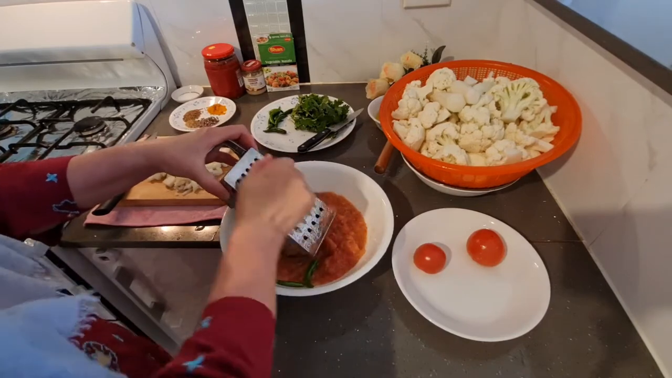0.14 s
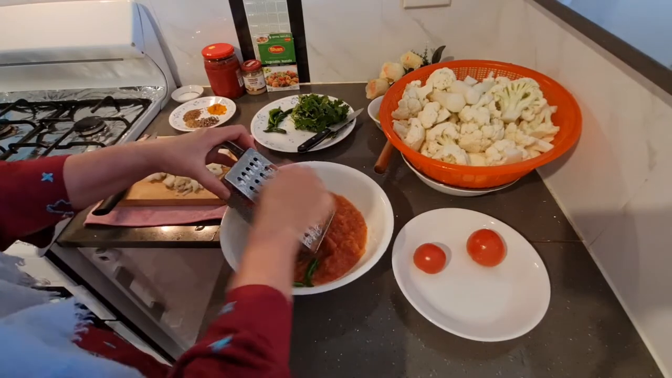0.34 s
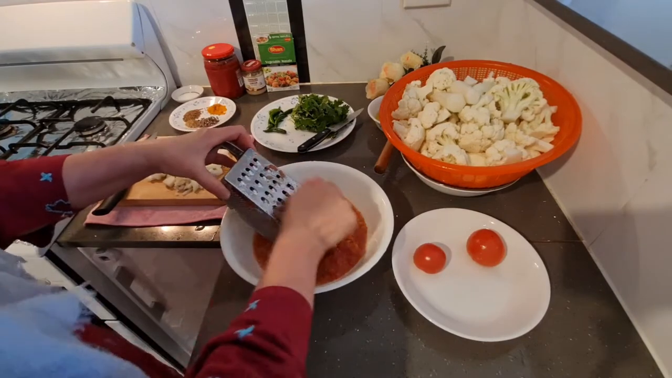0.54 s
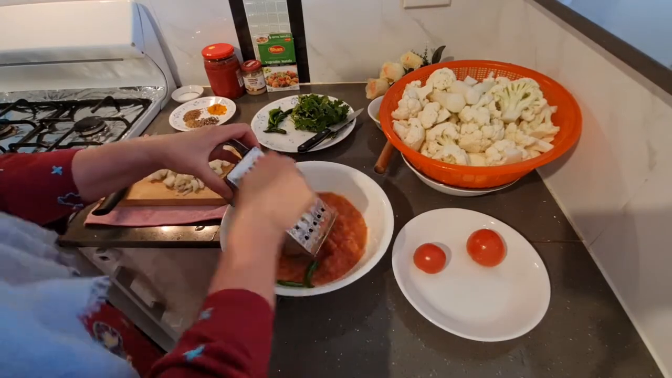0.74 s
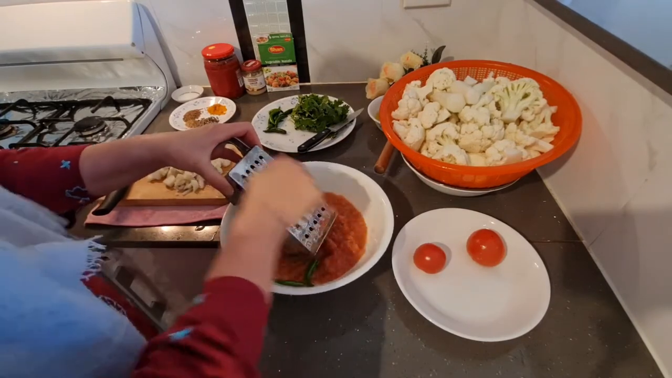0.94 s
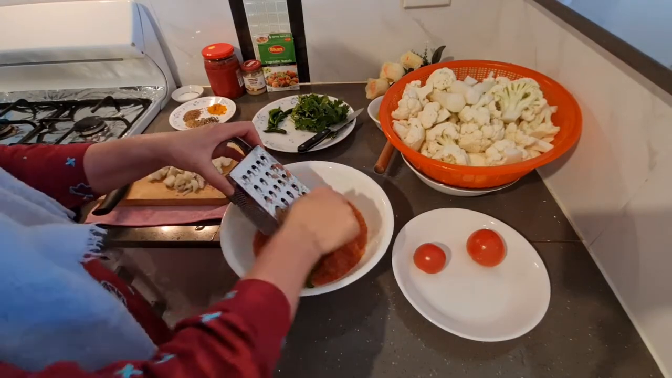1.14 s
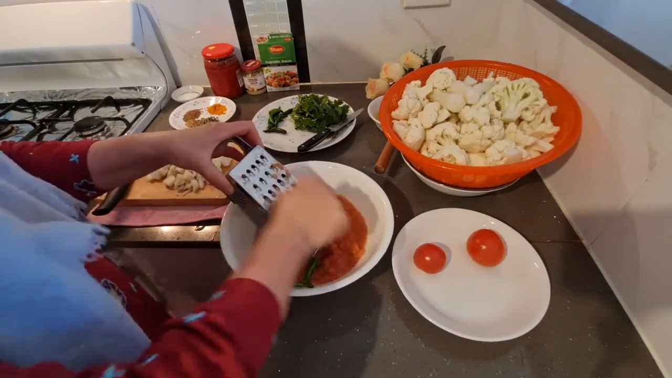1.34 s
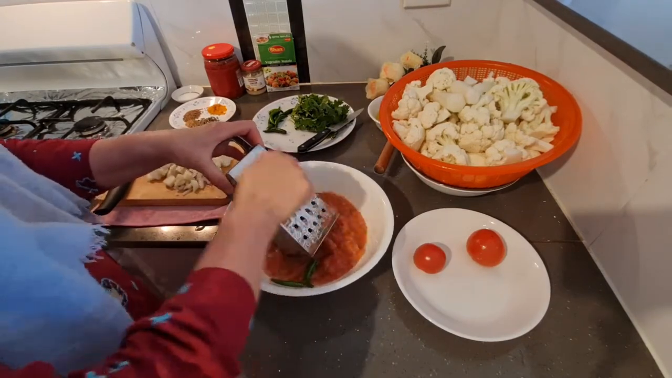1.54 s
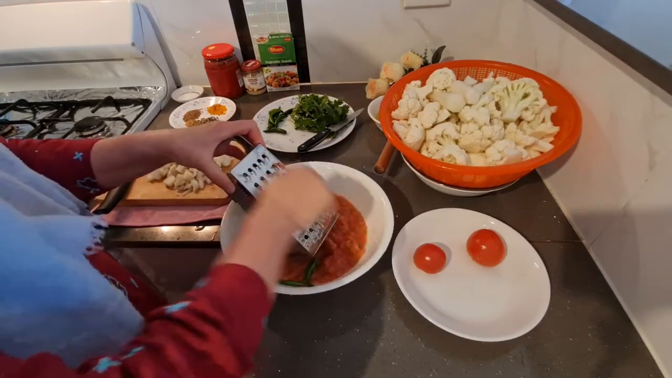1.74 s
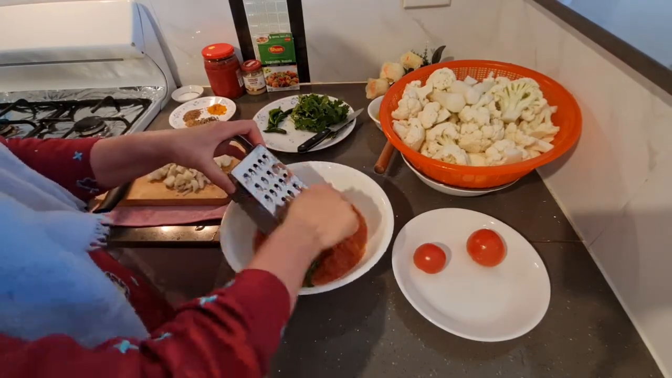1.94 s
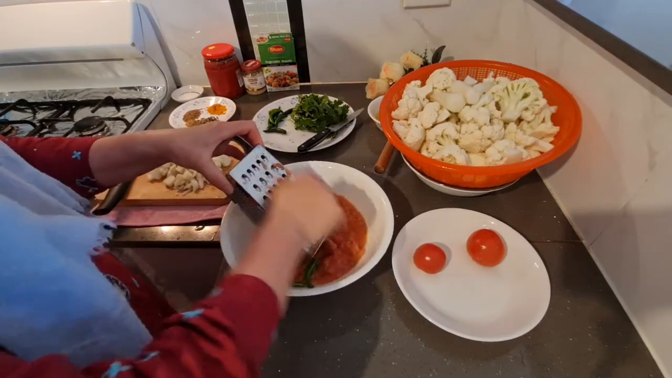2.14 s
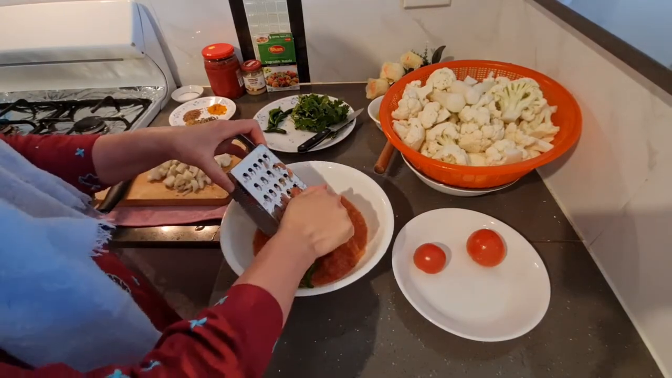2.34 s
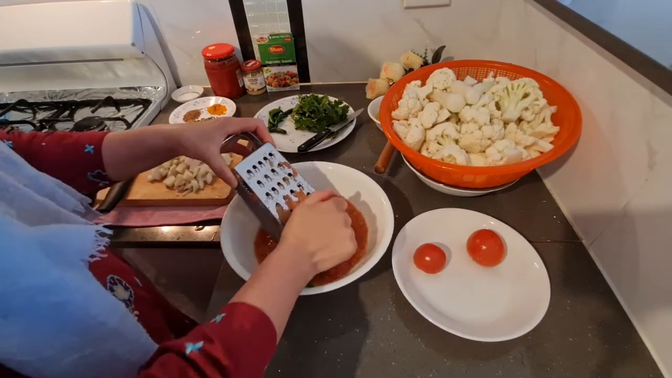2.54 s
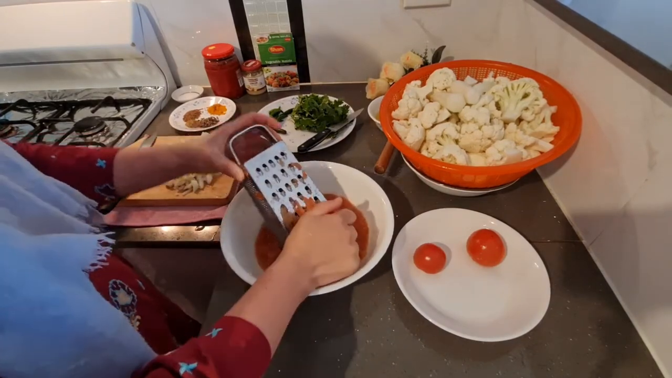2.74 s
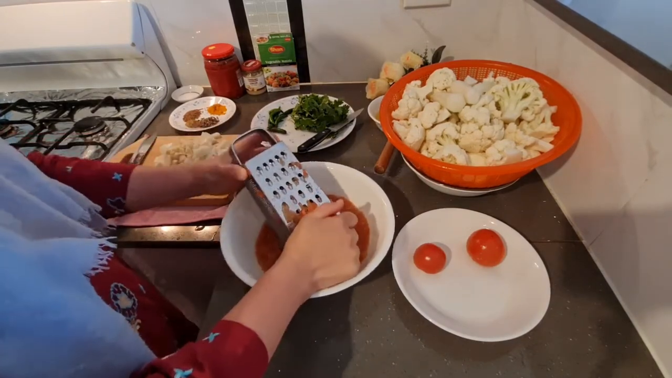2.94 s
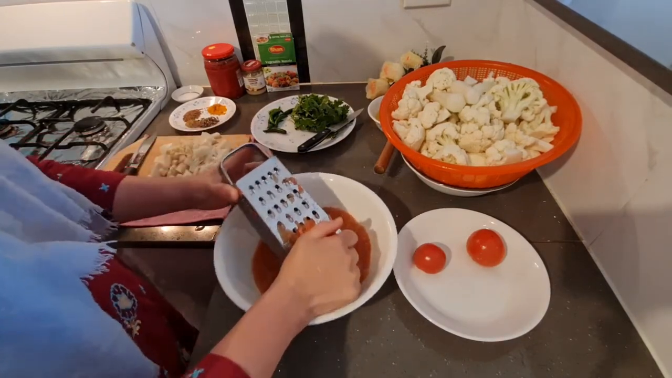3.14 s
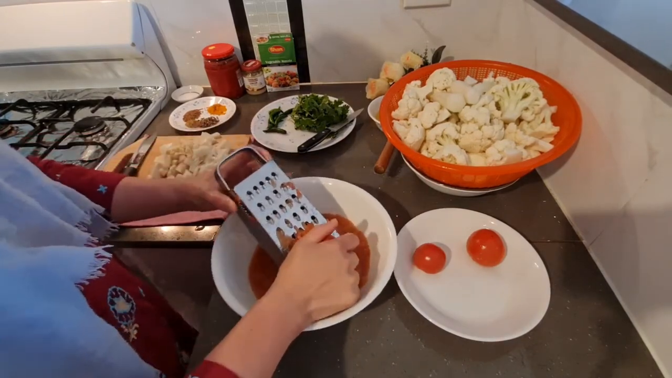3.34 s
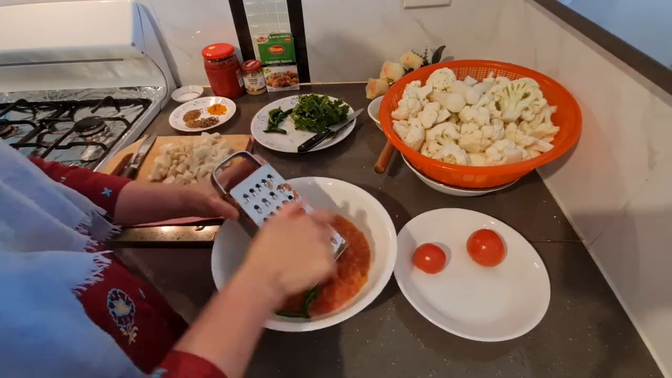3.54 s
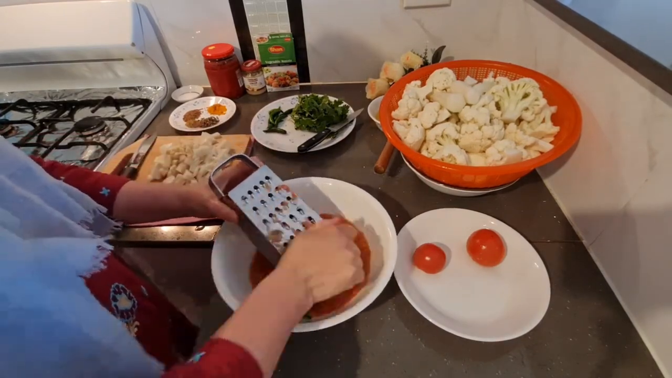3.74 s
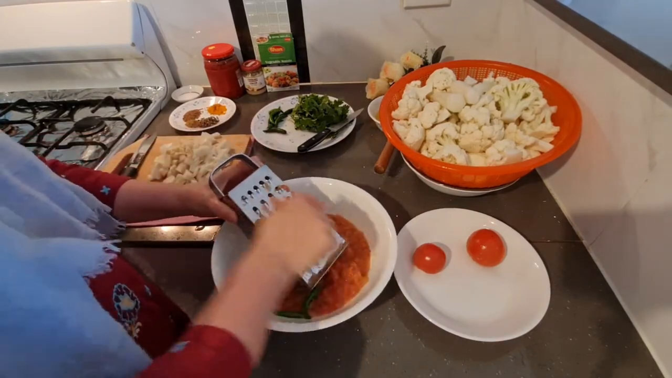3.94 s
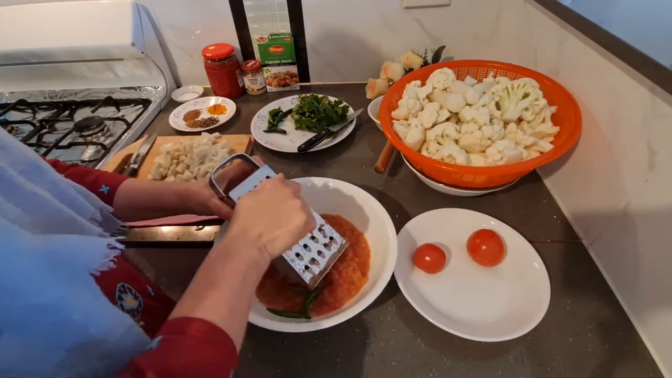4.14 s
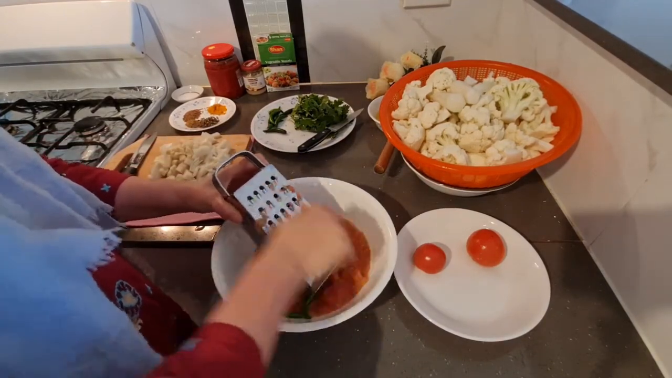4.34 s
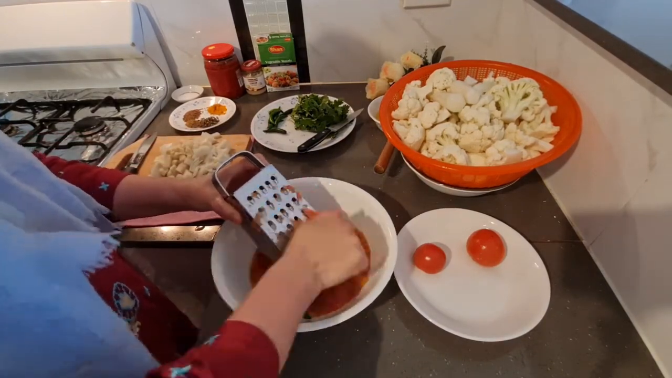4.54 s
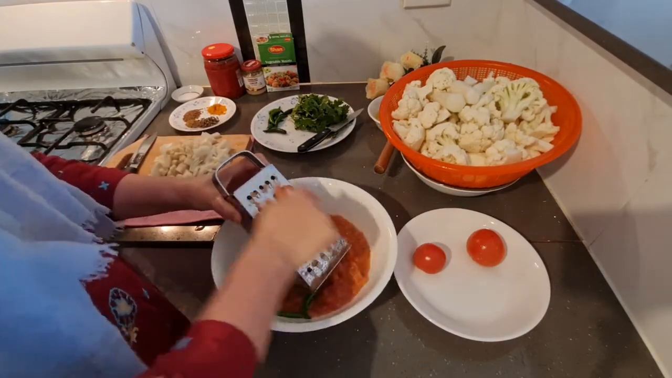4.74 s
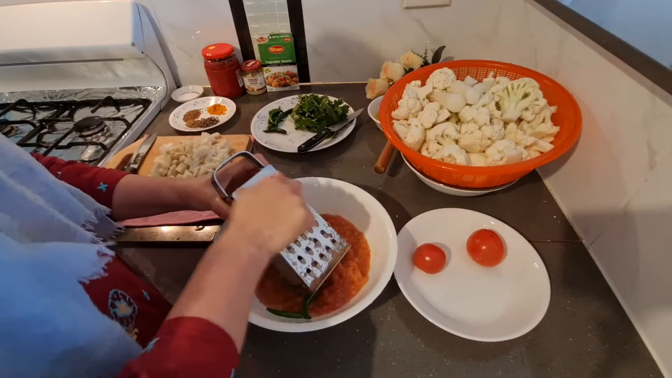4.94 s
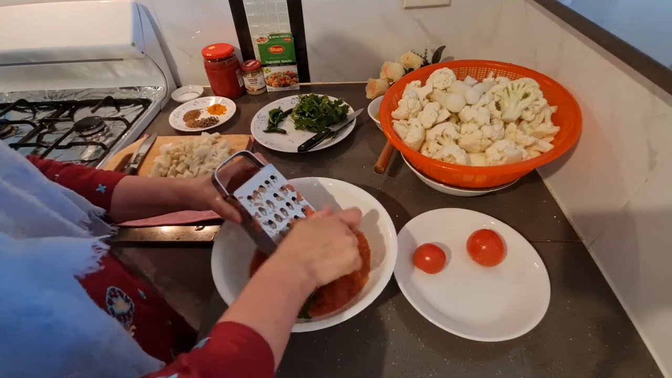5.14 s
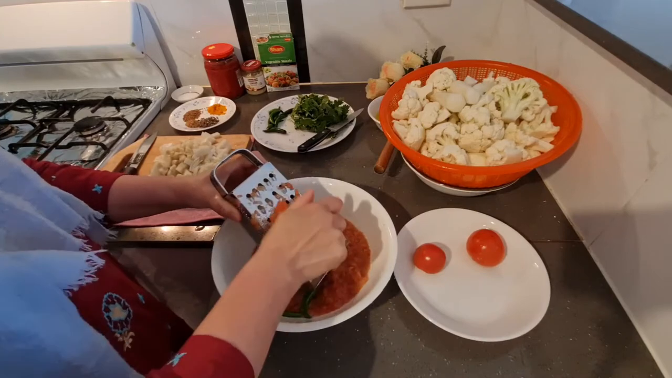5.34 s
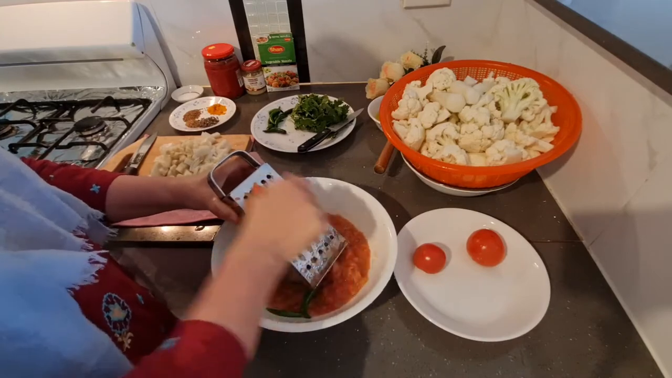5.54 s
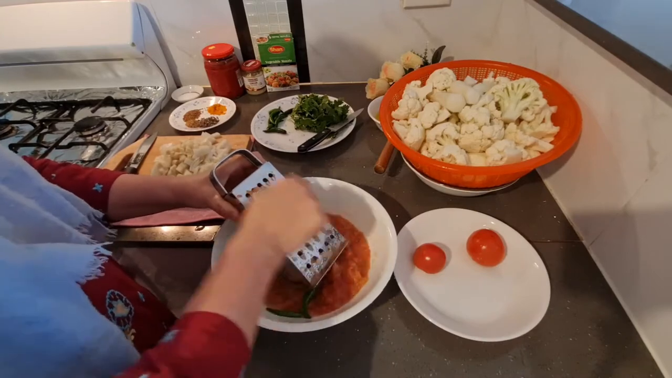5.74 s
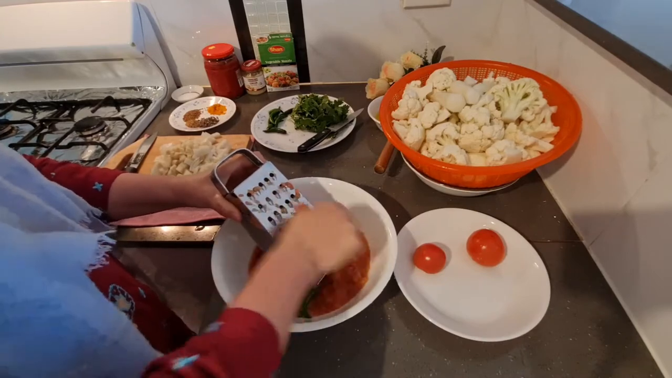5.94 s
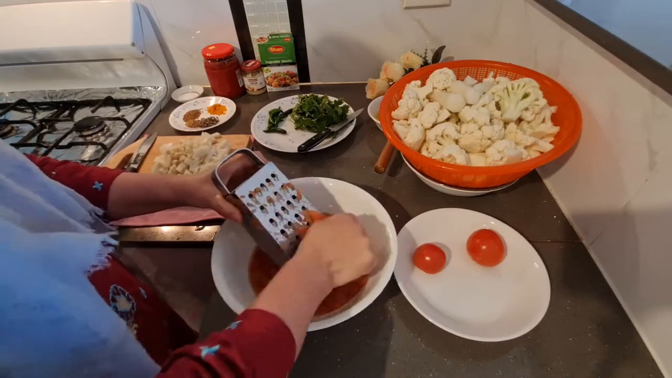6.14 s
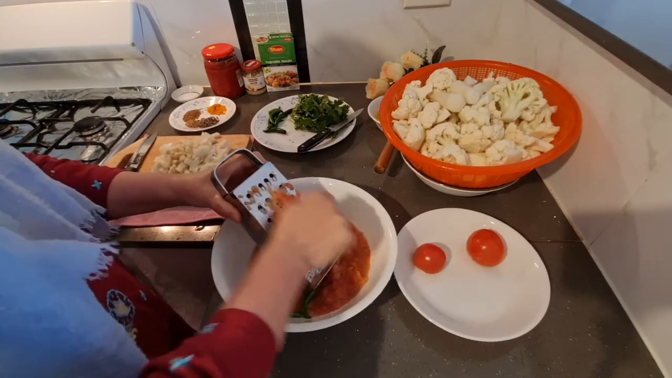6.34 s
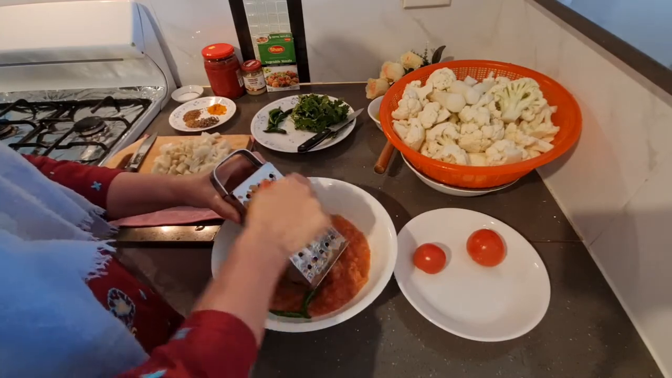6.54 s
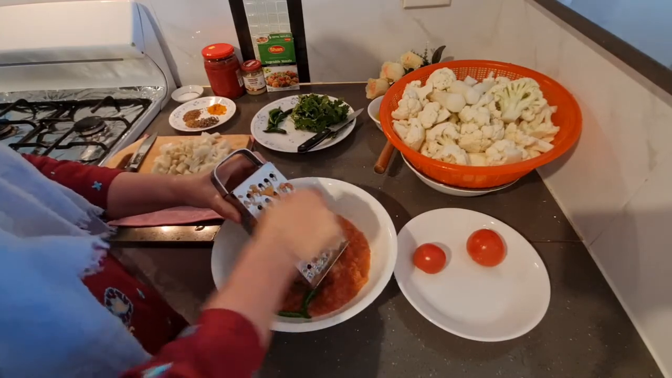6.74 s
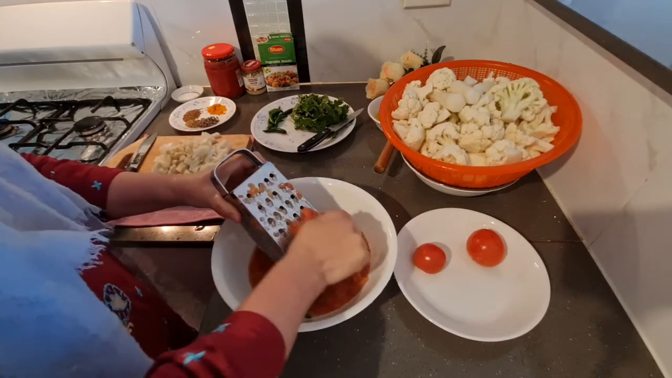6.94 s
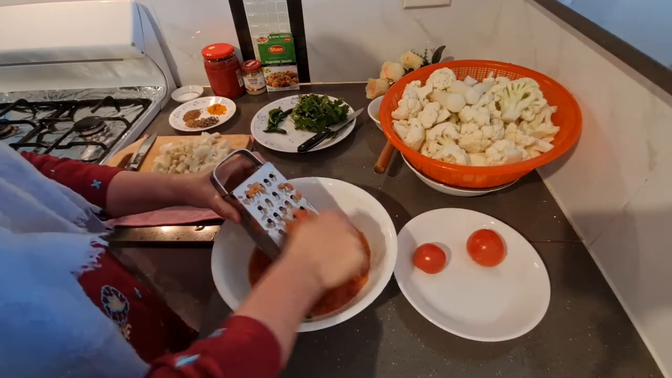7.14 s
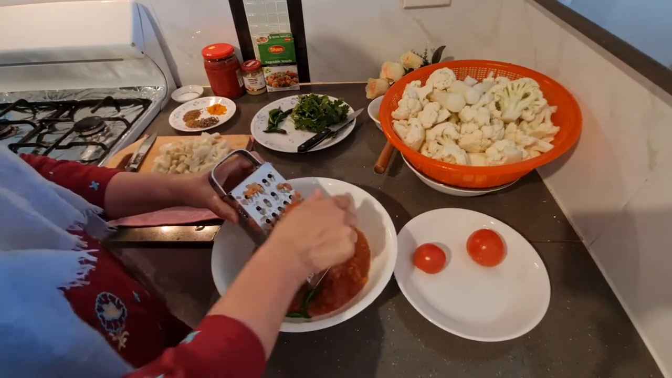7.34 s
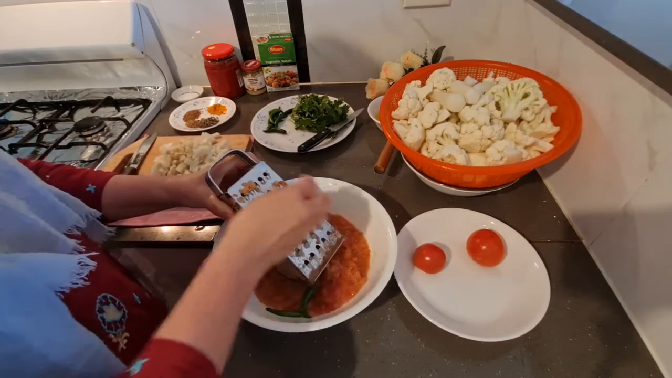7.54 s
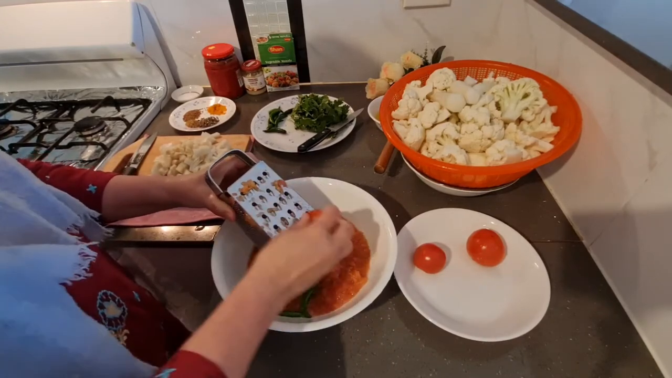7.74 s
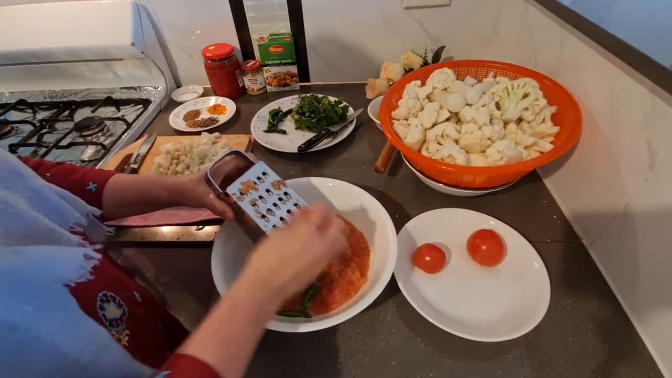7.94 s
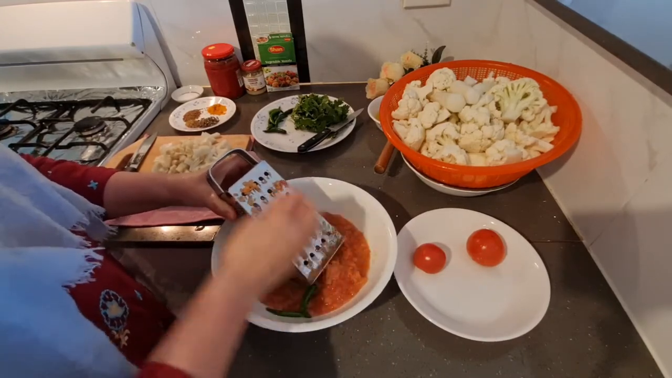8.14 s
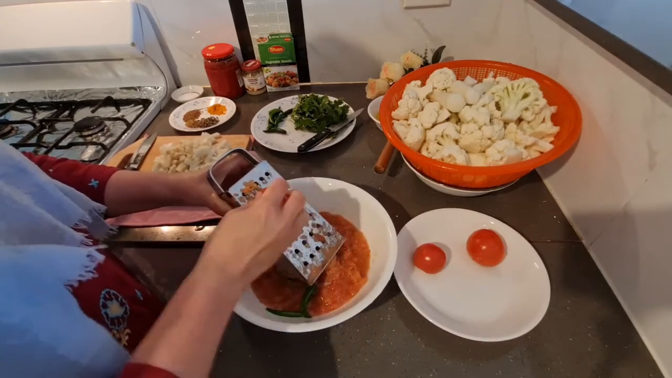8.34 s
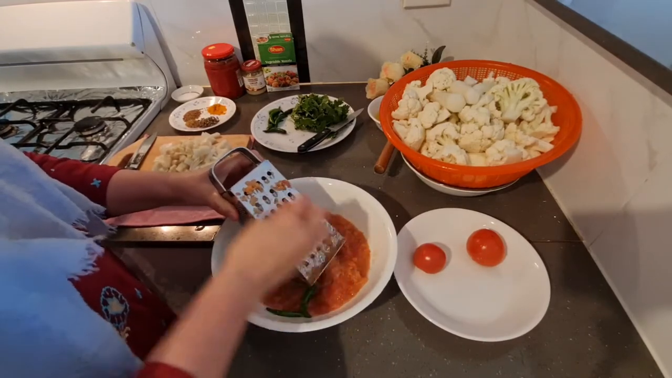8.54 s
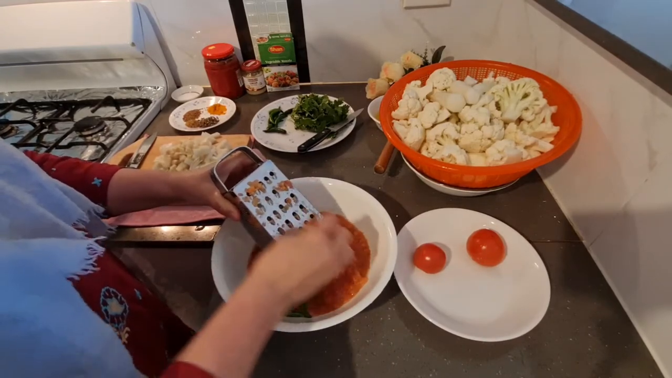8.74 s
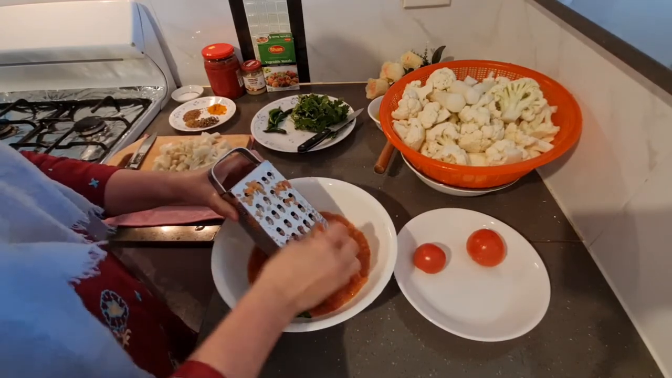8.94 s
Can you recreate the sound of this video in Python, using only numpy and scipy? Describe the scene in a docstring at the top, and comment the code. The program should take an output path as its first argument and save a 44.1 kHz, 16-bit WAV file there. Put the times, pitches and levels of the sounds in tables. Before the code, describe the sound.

A tomato is grated on a steel box grater in a bowl, heard close up in a very quiet kitchen. From the start, wet rasping strokes come about four times a second, each with a slight metallic ring and a low rumble through the counter. The loose bowl knocks on the counter with nearly every stroke, the loudest sound here, until about 2.8 seconds. The grating stops near 2.4 seconds, leaving a lull of soft handling and very faint wet squeaks. At 3.7 seconds the strokes resume without the knocking, dotted with small juice clicks and fingertip taps on the steel. They break briefly around 5.3 seconds, continue evenly from 5.6 to 7.3, and pause again. From 7.7 seconds lighter strokes carry on until the end at about 9 seconds.

```python
"""Grating a tomato

A steel box grater stands in a bowl on the counter of a very quiet kitchen. Each stroke tears wet flesh
over the teeth, rings the sheet steel and drums bowl and counter. At first the loose bowl rocks and
knocks at every stroke; later, wet skin squeaks faintly, juice clicks and fingertips tap the box."""
import sys
import numpy as np
from scipy import signal
from scipy.fft import rfft, irfft, next_fast_len
from scipy.io import wavfile
from scipy.ndimage import uniform_filter1d, map_coordinates

SR = 44100
rng = np.random.default_rng(int(sys.argv[2]) if len(sys.argv) > 2 else 0)


def put_to_file(sound):
    """Save the sound as 16-bit audio at rate SR, in the file named by the first command-line argument."""
    columns = np.atleast_2d(sound).T  # one column per channel
    safe = np.clip(columns, -1, 1)
    whole_steps = np.round(safe * 32767)
    wavfile.write(sys.argv[1], SR, whole_steps.astype(np.int16))


N = 396459


def amp(db):
    """Decibels to gain."""
    return 10 ** (np.asarray(db) / 20)

def unit(x):
    """Scale to rms 1."""
    return x / np.sqrt(np.mean(x ** 2) + 1e-20)

def along(points, hz):
    """Read a curve on a log frequency axis."""
    freqs, values = np.transpose(points)
    return np.interp(np.log(hz + 1), np.log(freqs + 1), values)

def automation(rows):
    """One lane per column after the time."""
    times, *lanes = np.transpose(rows)
    return [np.interp(np.arange(N) / SR, times, lane) for lane in lanes]

def filtered(x, response):
    """Apply a complex frequency response."""
    size = next_fast_len(N + SR)
    return irfft(rfft(x, size) * response(np.fft.rfftfreq(size, 1 / SR)), size)[..., :N]

def resonances(modes):
    """Response of a body with (pitch, width, level) modes."""
    return lambda f: sum((-1) ** k * amp(db) * 1j * f * width / (hz * hz - f * f + 1j * f * width)
                         for k, (hz, width, db) in enumerate(modes))

def struck(force, response):
    """Drive a body, at unity gain for white noise."""
    power = np.mean(np.abs(response(np.linspace(1, SR / 2, N // 4))) ** 2)
    return filtered(force, response) / np.sqrt(power)

def slips(grain_s, spread_db):
    """Friction: two noises share one uneven grip that changes every grain."""
    grip = map_coordinates(rng.standard_normal(N // 8), [np.arange(N) / (grain_s * SR)], order=1)
    return unit(amp(spread_db * grip) * rng.standard_normal((2, N)))

def clumps(pair, depth_db):
    """Clumps of pulp tear at their own pitch and moment: random patches of gain."""
    spectrum = signal.stft(pair, nperseg=128)[2]
    patches = uniform_filter1d(rng.standard_normal(spectrum.shape[1:]), size=5, axis=0)
    patches = unit(uniform_filter1d(patches, size=4, axis=1))
    return unit(signal.istft(spectrum * amp(depth_db * patches), nperseg=128)[1][:, :N])

def rub(gains, start, length, rasp_db, drum_db, peak, bite, rise, fall, steel_db, counter_db, bowl_db):
    """Add one rub to the envelopes: it bites at once, speeds up to its peak and slows to a stop."""
    at = np.arange(max(round(start * SR), 0), min(round((start + length) * SR), N))
    progress = (at / SR - start) / length
    peak = np.clip(peak, .05, .95)
    speed = bite + (1 - bite) * np.sin(np.pi / 2 * (progress / peak).clip(0, 1)) ** rise
    speed *= np.abs(np.cos(np.pi / 2 * ((progress - peak) / (1 - peak)).clip(0, 1))) ** fall
    levels_db = rasp_db + np.array([0, steel_db, counter_db + drum_db, bowl_db + drum_db])
    gains[:, at] += amp(levels_db)[:, None] * speed ** [[1], [.9], [1.4], [1.3]]

DOWN = dict(bite=.18, rise=1, fall=2.75, steel_db=-1.5, counter_db=13.5, bowl_db=-.5)
UP = dict(peak=.28, bite=.1, rise=3.2, fall=.5, steel_db=3.5, counter_db=9.5, bowl_db=2)
TOUCH = dict(peak=.54, bite=.12, rise=.61, fall=2.2, steel_db=1.5, counter_db=14, bowl_db=2.5)
# Strokes down over the teeth and back up:
# (start [s], time to the turn [s], nominal attack [s], down level [dB], up level [dB])
STROKES = [(-.08, .14, 0.08, -37, -54), (0.236, 0.13, 0.063, -37, -50), (0.525, 0.098, .09, -35.5, -43),
           (.802, .14, 0.063, -34.5, -46.5), (1.076, 0.13, 0.068, -33, -47),
           (1.346, 0.13, .068, -32.5, -45.5), (1.613, .15, 0.068, -32.5, -46), (1.894, .13, .054, -33, -44),
           (2.155, 0.13, .05, -33, -81), (3.733, 0.13, .03, -38, -43), (3.972, 0.13, 0.07, -35, -47),
           (4.247, .12, .07, -32.5, -45), (4.508, 0.16, 0.066, -34, -44.5), (4.785, 0.13, 0.069, -32, -44),
           (5.047, 0.13, 0.067, -34, -64.5), (5.603, 0.14, 0.061, -36, -47.5),
           (5.853, 0.13, 0.08, -32.5, -47), (6.11, 0.14, .068, -34, -41.5),
           (6.367, 0.13, 0.067, -33.5, -45), (6.624, 0.14, 0.045, -33, -44),
           (6.88, 0.13, 0.066, -33, -46.5), (7.145, 0.11, 0.071, -33, -65.5), (7.69, 0.13, 0.054, -45, -47),
           (7.947, 0.14, 0.043, -39, -47.5), (8.195, 0.12, 0.035, -37.5, -46.5),
           (8.438, 0.13, 0.041, -37, -48), (8.686, .12, .051, -38.5, -47), (8.934, .13, 0.067, -36, -46)]
# How hard the grater bears down: (time [s], counter gain [dB], bowl gain [dB])
PRESSURE = [(0, 1, -1), (1, -0.5, -2), (2, -1.5, 3), (2.4, 3, 19.5), (3.7, -0.5, -6.5), (5.2, 1.5, -8),
            (5.7, 0, -5), (7.2, 3, -1.5), (7.8, 6, 0.5), (8.99, 1, -0.5)]
# Fingers, bowl and grater shift in the pauses: (start [s], length [s], rasp [dB], drum boost [dB])
HANDLING = [(2.5, 0.089, -70, 15.5), (3.044, 0.27, -73.5, 24), (3.35, 0.2, -96, 28), (3.522, 0.065, -72, 1),
            (3.577, 0.04, -62.5, 6), (3.615, 0.16, -62, -3), (5.259, 0.085, -83.5, 14),
            (5.439, 0.074, -69.5, 8), (5.497, .11, -54, 2), (7.341, 0.1, -76.5, 20), (7.467, 0.055, -70, 6),
            (7.604, 0.12, -74.5, -13)]
def hand_envelopes():
    """The hand's motion sets the envelopes of rasp, steel, counter and bowl."""
    gains = np.zeros((4, N))
    rest_s, longest_up_s, catch_delay_s, catch_t60_s = .018, .14, .007, .048
    next_starts = [row[0] for row in STROKES[1:]] + [np.inf]
    for (start, down_s, attack_s, down_db, up_db), following in zip(STROKES, next_starts):
        peak = attack_s / down_s / 1.167
        rub(gains, start, 1.063 * down_s, down_db, 0, peak, **DOWN)  # overlaps the turn
        up_s = min(following - rest_s - start - down_s, longest_up_s)
        rub(gains, start + down_s, up_s, up_db, 0, **UP)
        since_catch = np.arange(N) / SR - start - catch_delay_s  # the skin catches and jolts the steel
        gains[1] += (since_catch > 0) * amp(down_db - 12 - 60 * np.abs(since_catch) / catch_t60_s)
    gains[2:] *= amp(automation(PRESSURE))
    for touch in HANDLING:
        rub(gains, *touch, **TOUCH)
    # Each layer settles after the hand slows.
    release_t60_s, release_db = np.array([.083, .1, .21, .5]), [-19.5, -14.5, -12.5, -8.5]
    poles = amp(-60 / (SR * release_t60_s))
    tails = [signal.lfilter([1 - pole], [1, -pole], gain) for pole, gain in zip(poles, gains)]
    return gains + amp(release_db)[:, None] * tails

def squelches(rasp, per_s=120, centre_hz=3290, spread_octaves=.7, life_cycles=11):
    """Pockets of juice burst as brief rising notes that ride the rasp envelope."""
    pitch, strength, *channels = rng.standard_normal((4, 4000, 1))
    t = np.arange(SR // 50) / SR
    onsets = np.cumsum(rng.exponential(size=4000) * SR / per_s).astype(int)
    hz = (centre_hz * 2 ** (spread_octaves * pitch)).clip(2400, 12000)
    life = t * hz / life_cycles
    envelope = amp(-4 + 4 * strength) * 3 * life * np.exp(1 - 3 * life)
    notes = envelope * np.sin(2 * np.pi * hz * t * (1 + .063 * life))
    heard = onsets < N
    at = (onsets[heard, None] + np.arange(len(t))).ravel()
    return rasp * [np.bincount(at, (notes * np.tanh(send))[heard].ravel(), N + SR)[:N]
                   for send in channels]

# Tone of tearing flesh: (frequency [Hz], level [dB])
FLESH_EQ = [(880, -14.5), (1500, -1.5), (2080, -13), (2800, -1.5), (3030, -12), (3920, -5), (7460, -6.5),
            (8830, -10), (12700, -5.5), (16000, -12)]
def tearing_flesh(rasp, treble_hz=7700, full_force_db=-29.5):
    """Flesh tears as a grainy, wet hiss; lighter rubbing is duller."""
    grains = clumps(slips(grain_s=.0015, spread_db=2), depth_db=2.5)
    hiss = struck(rasp * grains, lambda hz: amp(along(FLESH_EQ, hz))) + squelches(rasp)
    treble = filtered(hiss, lambda hz: 1 / (1 + (treble_hz / (hz + 1)) ** 8))
    brightness = (rasp / amp(full_force_db)) ** .1
    return hiss + treble * (brightness - 1)

# Ring of the sheet steel: (pitch [Hz], width [Hz], level [dB])
WALL_MODES = [(584, 215, 5.5), (791, 50, 13.5), (1020, 140, 2), (1300, 54, -0.5), (1650, 8.7, 8),
              (2413, 160, 2), (2905, 170, 0), (3332, 170, 4), (3728, 660, -0.5)]
# High and low voice of the hollow box: (pitch [Hz], width [Hz], level [dB])
HOLLOW_MODES = [(1170, 140, 2), (901, 280, 0)]
# Their balance as tomato and pulp cover the holes: (time [s], high voice [dB], low voice [dB])
HOLLOW_MIX = [(0, -10.5, -6.5), (2.5, -6, -3), (3.6, -0.5, -15.5), (5.2, -8.5, -5), (6, -8.5, -7),
              (7.2, -30.5, 2), (7.8, -18, 2), (8.99, -6.5, 3)]
def steel_box(envelope):
    """The teeth catch unevenly, ringing the walls and the hollow inside."""
    shaking = envelope * clumps(slips(grain_s=.0047, spread_db=2), depth_db=3.5)
    ring = struck(shaking, resonances(WALL_MODES))
    for mode, db in zip(HOLLOW_MODES, automation(HOLLOW_MIX)):
        ring += struck(amp(db) * shaking, resonances([mode]))
    return ring

# Boom of the countertop: (pitch [Hz], width [Hz], level [dB])
COUNTER_MODES = [(50.6, 27.8, -1), (75, 29.1, 2.5), (139.5, 26.1, -0.5), (254.5, 29, -11)]
def counter_drum(envelope):
    """The rubbing rumbles through the counter."""
    return struck(envelope * slips(grain_s=.0054, spread_db=.5), resonances(COUNTER_MODES))

# Ring of the bowl: (pitch [Hz], level [dB], t60 before damping [s])
BOWL_MODES = [(126.8, -4, 0.78), (236, 0, 0.93), (270.1, -4, 0.25), (345.7, -5, 0.25), (384.5, 4.5, 0.43),
              (417.2, -4.5, 0.36), (497, -5.5, 0.32), (538, -3, 0.26), (704, -10, 0.33),
              (867, -15.5, 0.068), (1090, -18, 0.06), (1320, -26, 0.031), (1597, -40, 0.042)]
def bowl_body(modes=slice(None), damping=1):
    """A slice of the bowl's modes, widened when it is held down."""
    return resonances([(hz, damping * np.log(1000) / (np.pi * t60), db)
                       for hz, db, t60 in BOWL_MODES[modes]])

def bowl_drum(envelope):
    """The grater buzzes against the bowl; pulp deadens the upper modes."""
    buzz = envelope * slips(grain_s=.0081, spread_db=3)
    lows = struck(buzz, bowl_body(np.s_[:3], damping=2.7))
    highs = struck(buzz, bowl_body(np.s_[3:], damping=9.6))
    return lows + amp(-5) * highs

# Tone of the room's air: (frequency [Hz], level [dB])
AIR_EQ = [(18, -34.5), (30, -12.5), (260, -11.5), (794, -13.5), (1170, -20), (1600, -40.5), (4000, -36.5),
          (15000, -36.5)]
def room_tone():
    """Faint, dark, steady air."""
    return unit(filtered(rng.standard_normal((2, N)), lambda hz: amp(along(AIR_EQ, hz))))

# Where the rim lands decides which modes ring:
# (time [s], level [dB], rattle's 20 dB decay [s], lower ring [dB], upper ring [dB])
BOWL_KNOCKS = [(0.151, -23.5, 0.089, 3, -5.5), (0.482, -13.5, 0.072, -7, -4), (0.533, -22.5, 0.14, 0, -13),
               (0.691, -16, 0.14, -3.5, -6.5), (0.857, -26, 0.05, -2, -14), (1.042, -11, 0.13, -1.5, -5.5),
               (1.318, -17, 0.097, 3, -5), (1.585, -16.5, 0.083, -2.5, -5), (1.879, -14.5, 0.049, -7, -4.5),
               (2.056, -31, 0.11, -7, -14), (2.134, -12, 0.11, -6.5, -4), (2.215, -35.5, 0.081, 5, -13),
               (2.4, -20.5, 0.1, 1.5, -5), (2.64, -18, 0.1, -2, -4), (2.718, -22.5, 0.025, -2, -10),
               (2.812, -42, 0.067, -11, -8.5), (3.059, -51, 0.33, 1.5, 2), (5.292, -47, 0.038, -10, -15),
               (5.45, -53.5, .06, -6, -15)]
def bowl_knocks(bounces_per_s=300):
    """The bowl hits the counter and rattles to rest: a thud, a ring and the crack of the rim."""
    blows, lower, upper, crack = np.zeros((4, N + SR))
    t = np.arange(SR // 4) / SR
    for start, db, rattle_s, lower_db, upper_db in BOWL_KNOCKS:
        noise = rng.standard_normal(len(t))
        contacts = rng.random(len(t)) < bounces_per_s / SR
        bounces = np.tanh(2 * noise) * contacts * amp(-3.5 - 20 * t / rattle_s)
        bounces[0] = 1  # the first blow
        at = round(start * SR) + np.arange(len(t))
        blows[at] += amp(db) * bounces
        lower[at] += amp(db + lower_db) * bounces
        upper[at] += amp(db + upper_db) * bounces
        crack[at] += amp(db - 60 * t / (1.6 * rattle_s)) * noise
    ring = amp(-6) * struck(blows[:N], bowl_body(np.s_[:1], damping=1.8))
    ring += struck(lower[:N], bowl_body(np.s_[1:3], damping=1.37))
    ring += amp(7) * struck(upper[:N], bowl_body(np.s_[3:], damping=3.1))
    thud = struck(blows[:N], bowl_body(damping=9.9))
    boom = struck(blows[:N], resonances(COUNTER_MODES))
    body = amp(-4) * ring + amp(-3) * thud + amp(-9.5) * boom
    soft = filtered(body, lambda hz: 1 / (1 + 1j * hz / 1900) ** 2)  # rounded rim on a wet counter
    edge = struck(crack[:N], lambda hz: 1j * hz / (900 + 1j * hz) / (1 + 1j * hz / 2100) ** 3)
    return amp(24) * soft + amp(-20.5) * edge

# Faint wet squeaks: (start [s], length [s], pitch [Hz], level [dB])
SKIN_SQUEAKS = [(3.04, .28, 10800, -80), (3.37, .15, 7300, -85), (3.3, .08, 5900, -86)]
def skin_squeaks(width_hz=300):
    """Wet skin on steel whistles in narrow, wavering bands."""
    out, t = np.zeros((2, N)), np.arange(N) / SR
    for start, length, hz, db in SKIN_SQUEAKS:
        swell = np.sin(np.pi * ((t - start) / length).clip(0, 1)) ** .5
        out += amp(db) * swell * struck(rng.standard_normal((2, N)), resonances([(hz, width_hz, 0)]))
    return out

# Juice clicks and fingertips on the box: (time [s], level [dB], starting pitch [Hz])
WET_SNAPS = [(3.5355, -42, 7200), (3.586, -43.5, 1150), (3.6336, -32.5, 1170), (3.906, -20, 1116),
             (4.449, -11, 14200), (4.9622, -17.5, 1236), (5.3537, -35.5, 1180), (7.3888, -24.5, 12500),
             (7.4784, -37, 1190), (7.9842, -17.5, 1150), (8.078, -12, 12600), (8.367, -20.5, 1065)]
def wet_snaps(attack_s=.0017, t60_s=.015):
    """Each click or tap is a short, rough, rising chirp."""
    out, t = np.zeros(N + SR), np.arange(SR // 20) / SR
    envelope = amp(-60 * t / t60_s) * (1 - np.exp(-t / attack_s))
    for start, db, hz in WET_SNAPS:
        wander = np.cumsum(rng.normal(0, .18 + hz / 40000, len(t)))  # roughens the pitch
        chirp = np.sin(2 * np.pi * hz * t * (1 + 9 * t) + wander)
        out[round(start * SR):][:len(t)] += amp(db) * envelope * chirp
    return out[:N]

# Decay of the kitchen: (frequency [Hz], t60 [s])
ROOM_DECAY = [(200, 0.29), (2000, 0.27), (10000, 0.19)]
def kitchen_reverb(x):
    """A short room tail whose treble dies first."""
    hz, t, spectrum = signal.stft(rng.standard_normal((2, SR // 2)), SR, nperseg=256)
    decay = amp(-60 * t / along(ROOM_DECAY, hz)[:, None])
    tail = signal.istft(spectrum * decay, SR, nperseg=256)[1]
    return signal.fftconvolve(x[None], tail / np.linalg.norm(tail[0]), axes=1)[:, :N]

# Stereo image: (frequency [Hz], left-right correlation [0-1])
CORRELATION = [(100, 0.95), (300, 0.97), (700, 0.58), (2000, 0.25), (6000, 0.13), (14000, 0.12)]
def spread(pair):
    """Two unrelated signals become mid and side: narrow bass, wide treble."""
    def mid_side(hz):
        angle = np.arccos(along(CORRELATION, hz)) / 2
        return np.array([np.cos(angle), np.sin(angle)])
    mid, side = filtered(pair, mid_side)
    return np.array([mid + side, mid - side])

# Stereo balance: (frequency [Hz], left minus right [dB])
BALANCE = [(60, -2), (150, -0.5), (380, 0), (950, -0.5), (2380, 0), (5980, -0.5), (15000, 1.5)]
def scene():
    """Close, direct hits over a wide bed of grating and room."""
    hits = bowl_knocks() + amp(-3.5) * wet_snaps()
    rasp, steel, counter, bowl = hand_envelopes()
    grating = amp(1.5) * tearing_flesh(rasp) + amp(-2.5) * steel_box(steel)
    grating += amp(-7) * counter_drum(counter) + amp(-4.5) * bowl_drum(bowl)
    bed = grating + skin_squeaks() + amp(-72.5) * room_tone()
    reverb = amp(-4) * kitchen_reverb(hits) + amp(-6) * kitchen_reverb(grating[0])
    mix = hits + spread(bed + reverb)
    sides, lead_s = np.array([[.5], [-.5]]), .00013  # the left microphone is nearer
    return filtered(mix, lambda hz: amp(sides * along(BALANCE, hz))
                    * np.exp(2j * np.pi * hz * lead_s * sides))

def record(dry):
    """The microphone's low cut and a hard ceiling on the treble."""
    low_cut_hz, top_hz = 39, 15950
    return filtered(dry, lambda hz: (1j * hz / (low_cut_hz + 1j * hz)) ** 4 * (hz < top_hz))


dry = scene()
out = record(dry)
put_to_file(out)
```